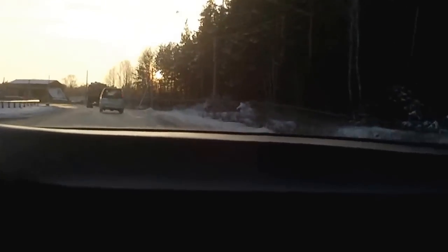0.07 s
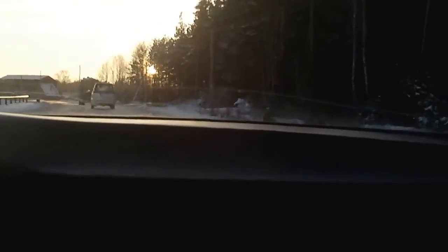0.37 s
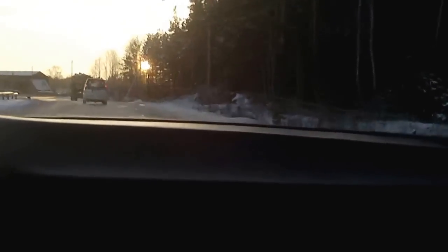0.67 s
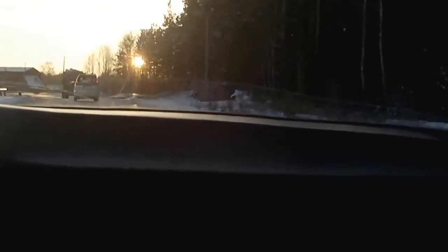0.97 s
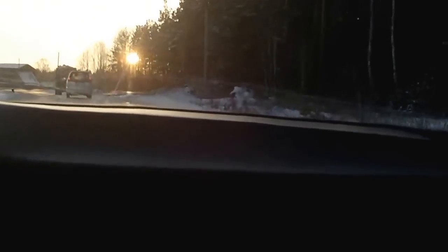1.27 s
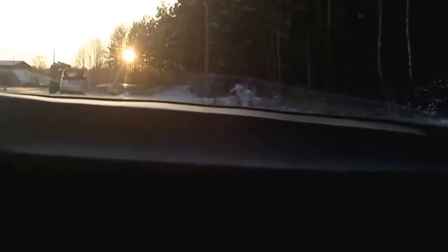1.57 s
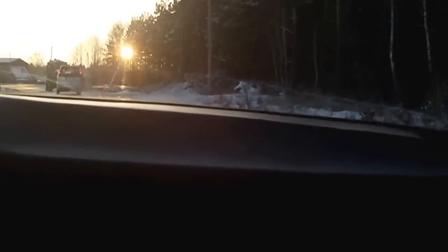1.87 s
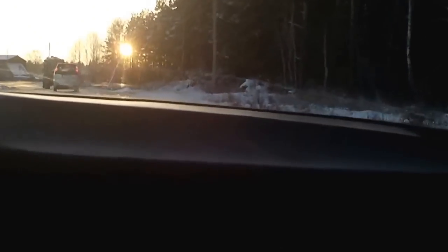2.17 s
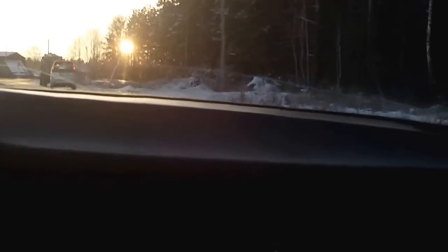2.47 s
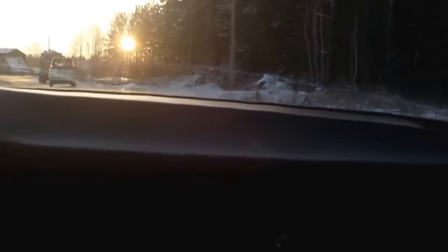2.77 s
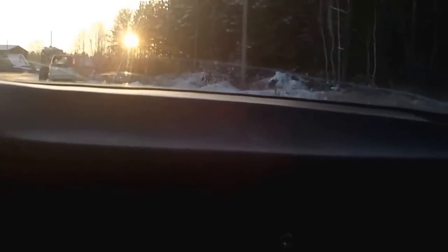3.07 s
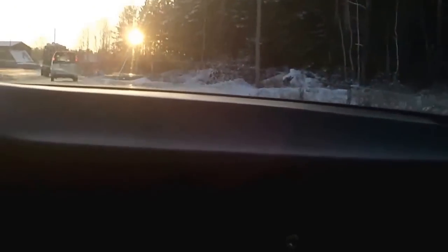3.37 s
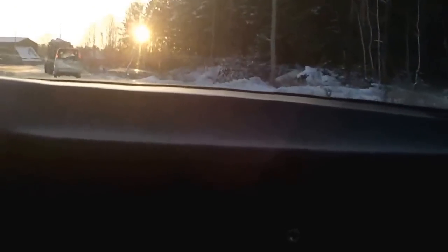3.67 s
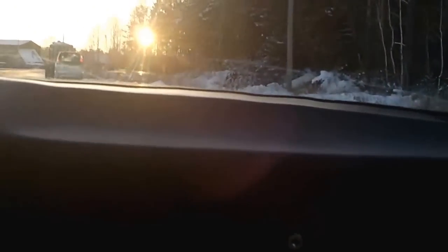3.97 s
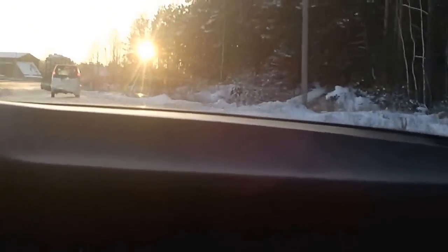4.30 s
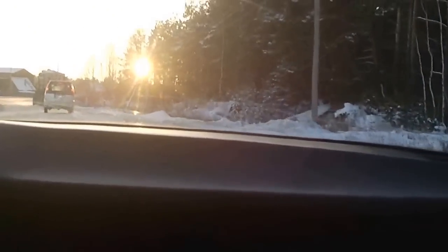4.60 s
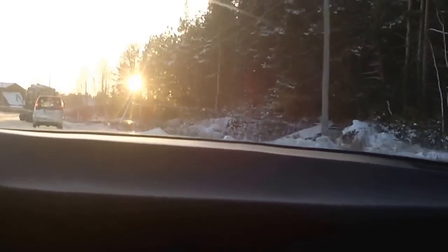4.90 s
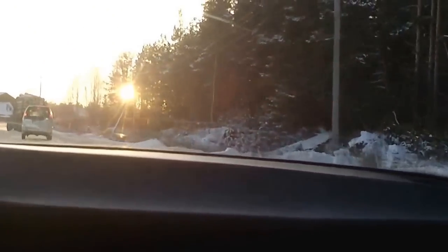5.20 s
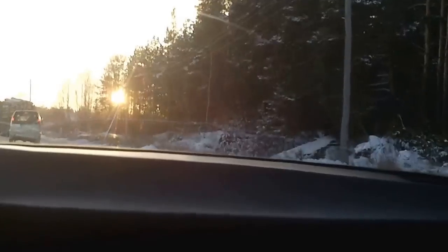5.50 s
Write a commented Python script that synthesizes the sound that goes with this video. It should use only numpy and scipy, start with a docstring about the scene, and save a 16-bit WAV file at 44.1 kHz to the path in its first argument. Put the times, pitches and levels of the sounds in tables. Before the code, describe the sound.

Inside a car on a highway, a loud low rumble swells over uneven asphalt, with a dull tyre roar and an engine drone. About halfway through, plastic squeaks three times in quick succession close to the dashboard microphone, followed by scattered light ticks and faint rustles. The car then slows harder, so the drone sinks in pitch and the road noise eases. A faint hiss lies underneath.

```python
"""Inside a car on a winter highway, microphone at the dashboard. From the start the body rumbles over uneven
asphalt, the tyres roar dully and the engine drones as the car coasts. At 2.5 s rubbed plastic squeaks three
times close by, then ticks and rustles in the small, padded cabin. From 3.6 s the car slows harder in gear:
the drone sinks and the road noise eases, with the sharpest tick at 4.6 s. The microphone's own hiss and a
thin electronic whine lie under it all."""
import sys
import numpy as np
from scipy import signal
from scipy.fft import rfft, irfft
from scipy.io import wavfile
from scipy.ndimage import uniform_filter1d, minimum_filter1d

SR = 44100
rng = np.random.default_rng(int(sys.argv[2]) if len(sys.argv) > 2 else 0)


def master_out(mix):
    """Clip the mix to full scale and print it as 16-bit PCM to the path in sys.argv[1]."""
    frames = np.transpose(np.atleast_2d(mix))
    ceiling = np.clip(frames, -1, 1)
    pcm = np.round(ceiling * 32767).astype(np.int16)
    wavfile.write(sys.argv[1], SR, pcm)


N = 249165
TIME = np.arange(N) / SR
TOP_HZ = 15900  # upper edge of the sound

# the car coasts, then slows harder, staying in gear: (time [s], crankshaft speed [Hz])
SLOWDOWN = [(0, 46.85), (1.4, 45.0), (3.62, 41.0), (5.65, 28.7)]
CRANK_HZ = np.interp(TIME, *np.transpose(SLOWDOWN))
SPEED = CRANK_HZ / CRANK_HZ[0]  # share of full speed


def road(rumble_db=-10, boom_db=-16.5, roar_db=-38.5, tread_db=-51):
    """Asphalt shakes body and wheels; tyres roar and hiss over rough patches; all fade with speed."""
    # spectra from inside the car, each (frequency [Hz], relative level [dB])
    body_rumble = [(6, -0.5), (14, 4.5), (24, -3), (36, 2.5), (48, -10), (66, -17.5), (96, -25.5),
                   (120, -16), (158, -23.5), (200, -21.5), (265, -23.5), (310, -31.5), (450, -55.5),
                   (1500, -110)]
    wheel_boom = [(15, -70), (38, -8.5), (50, -2), (72, -0.5), (100, -18.5), (300, -85)]
    tyre_roar = [(200, 0.5), (340, 6), (430, 3.5), (520, 0), (620, 0.5), (820, -1), (1020, -7),
                 (1280, -8.5), (1600, -21.5), (6000, -96)]
    tread_hiss = [(300, 8), (1500, 6.5), (2100, 6.5), (2900, 4), (3500, 1), (4200, -7.5), (5600, -17),
                  (7000, -23), (15000, -57)]
    surface = walk(16)
    body = noise(body_rumble) * undb(rumble_db) * SPEED ** .71
    wheels = noise(wheel_boom) * undb(boom_db) * SPEED ** 4.5
    tyres = noise(tyre_roar) * undb(roar_db + .5 * surface) * SPEED ** 1.29
    tread = noise(tread_hiss) * undb(tread_db + .9 * walk(24.78)) * SPEED ** .81
    return body + wheels + tyres + tread


def bumps(spread=1.8):
    """Each bumpy stretch makes the body heave or boom for a moment around one frequency."""
    # bumpy stretches of road: (middle [s], length [s], level [dB], body shake [Hz])
    stretches = [(.41, .25, -22, 122), (.5, .55, -17, 58), (.83, .2, -11, 30), (1.01, .14, -15, 62),
                 (1.215, .16, -8.5, 63), (1.3, .3, -8.5, 27), (1.51, .18, -23, 135), (1.65, .25, -12, 28),
                 (2.02, .08, -42, 520), (2.05, .25, -16, 60), (2.2, .45, -8, 32), (2.92, .4, -12.5, 33),
                 (3.895, .08, -39, 410), (3.93, .38, -9, 27), (4.43, .2, -14, 28), (5.17, .16, -13, 32),
                 (5.25, .2, -17, 56), (5.47, .2, -11.5, 26), (5.6, .16, -24, 112)]
    out = 0
    for middle, length, db, hz in stretches:
        band = [(hz / spread ** 2, -60), (hz / spread, -14), (hz, 0),
                (hz * spread, -20), (hz * spread ** 3, -100)]
        out = out + noise(band) * undb(db) * swell(middle, length)
    return out


def engine(waver_db=2.0, flutter_db=2.5, wander=.00699):
    """Engine and gearbox tones slide through the cabin's resonances and flutter as the car shakes."""
    # orders: (multiple of crankshaft speed, level at full speed on a 0 dB resonance [dB], power of speed)
    orders = [(3, -32, 2), (3.25, -37.5, -3.2), (4, -29, 3.5), (5, -29, 0), (6, -39, 0), (7, -46, -1.5),
              (8, -47, 1), (14.55, -51, 1.5), (19.3, -51, 3)]
    # cabin resonances: (centre [Hz], width [Hz], peak [dB])
    modes = [(113.4, 20, 1.5), (124.9, 4.3, 3.5), (135, 11.5, -0.5), (173.8, 6.3, -4.5), (185.7, 26.6, 0),
             (209.1, 13.7, 3), (222.4, 17.7, -0.5), (268.3, 17, 0), (349, 125, 0), (615, 77, -1),
             (774, 230, -5.5), (890, 28, -2)]
    crank_angle = 2 * np.pi * np.cumsum(CRANK_HZ * (1 + wander * walk(14))) / SR
    out = 0
    for order, db, power in orders:
        mode_gains = [undb(peak) * resonance(order * CRANK_HZ, hz, width) for hz, width, peak in modes]
        cabin_gain = np.linalg.norm(mode_gains, axis=0)
        level_db = db + waver_db * walk(7.4) + flutter_db * walk(35)
        tone = np.sqrt(2) * np.sin(order * crank_angle + 2 * np.pi * rng.random())
        out = out + tone * cabin_gain * SPEED ** power * undb(level_db)
    return out


def squeaks(release_s=.01, chatter_db=2.3, second_contact_db=-4.5):
    """Plastic close by sticks and slips at two contacts whose rates clash in a rasp, over a dry scrape."""
    # rubbing strokes: (start [s], length [s], attack [s], level [dB], tilt [dB/octave],
    # scrape against tone [dB], unsteadiness of slip [0-1], second contact's rate against the first [ratio])
    strokes = [(2.502, .042, .004, -46.5, -1, 0, .13, 1.2), (2.549, .032, .008, -50.5, -.5, -6, .04, .97),
               (2.607, .056, .024, -40.8, .4, -8, .08, 1.36),
               (2.672, .044, .002, -41.6, -1.3, -8, .065, 1.16)]
    # climbs through two strokes, then drops and settles in each of the others: (time [s], slip rate [Hz])
    slip_rate = [(2.502, 1000), (2.535, 3100), (2.555, 5600), (2.574, 5800), (2.582, 6700), (2.607, 13500),
                 (2.611, 8800), (2.618, 5400), (2.63, 4100), (2.645, 4300), (2.66, 5200), (2.671, 5300),
                 (2.673, 10500), (2.677, 7500), (2.69, 5800), (2.702, 4950), (2.725, 5100)]
    # what the rubbed plastic radiates: (frequency [Hz], gain [dB])
    plastic = [(600, -17), (1700, 4), (3300, 2), (4400, -3), (5800, -.5), (7000, -4), (8200, 2.5),
               (9200, -4), (10400, 2), (11800, -3), (13500, 2.5), (14500, -5), (16000, -7)]
    scrape_band = [(1500, -4), (5000, -4), (8000, -3), (10500, 1), (13500, 1), (15000, -2), (18000, -30)]
    glide_hz = np.interp(TIME, *np.transpose(slip_rate))
    second_gain = undb(second_contact_db)
    out = 0
    for start, length, attack, db, tilt_db, scrape_db, rough, ratio in strokes:
        age = TIME - start
        contact = np.clip(np.minimum(age / attack, .5 + (length - age) / release_s), 0, 1)
        first = stick_slip(glide_hz, rough)
        second = second_gain * stick_slip(glide_hz * ratio, rough)
        tone = (first + second) / np.hypot(1, second_gain)
        grip = np.sqrt(contact) * undb(db + chatter_db * walk(300))
        scrape = noise(scrape_band) * undb(scrape_db)
        out = out + grip * colour(tone + scrape, plastic, tilt_db)
    return cabin(out, t60=.04, wet_db=-5)


def stick_slip(hz, rough):
    """One contact slipping at an unsteady rate: up to three equal harmonics, rms 1."""
    phase = 2 * np.pi * np.cumsum(hz * (1 + rough * walk(2200))) / SR
    audible = [k * hz < TOP_HZ for k in range(1, 4)]
    tone = sum(on * np.sin(k * phase) for k, on in enumerate(audible, 1))
    return tone / np.sqrt(np.maximum(sum(audible), 1) / 2)


def ticks(attack_s=.001):
    """Short bursts of tiny slips each ring one plastic part close by; a soft contact has no top."""
    # plastic ticks: (time [s], level with the energy spread over 10 ms [dB], tilt [dB/octave],
    # decay [s], ring [Hz], ring strength [dB], top of the treble [Hz])
    contacts = [(2.826, -46, -5, .008, 2400, 6, 6000), (3.123, -50, 0, .005, 2800, 4, 11000),
                (3.291, -38.5, 0, .009, 3000, 4, 12500), (3.299, -35, -1.2, .011, 3150, 5, 15500),
                (3.594, -44.5, -2, .012, 2300, 8, 6000), (4.266, -43, -1, .004, 5300, 7, 5800),
                (4.42, -50, 3, .006, 2800, 4, 14000), (4.463, -49, -3, .004, 1900, 4, 6000),
                (4.6185, -31, .2, .0068, 2450, 3.5, 14500), (4.836, -41.5, 1.5, .009, 1200, 8, 15500),
                (5.335, -50.5, -2, .004, 2400, 6, 14000), (5.523, -52, 2, .003, 2800, 4, 8000)]
    # colour common to all ticks: (frequency [Hz], relative level [dB])
    plastic = [(200, -40), (700, -6), (1150, 4), (1650, 0), (2100, 3), (3000, 1), (4100, -6.5), (5700, -2),
               (7200, -11), (8400, -4), (9400, -9.5), (10600, -4), (12000, -9), (13200, -8.5), (14500, -17),
               (15800, -18)]
    out = np.zeros(N)
    t = TIME[:SR // 10]
    lead = SR // 200  # room for the filters to ring ahead of the tick
    for time, db, tilt_db, decay_s, ring_hz, ring_db, top_hz in contacts:
        slips = rng.standard_normal(len(t)) * np.minimum(t / attack_s, 1) * np.exp(-t / decay_s)
        click = colour(np.roll(slips, lead), plastic, tilt_db)
        part = [(ring_hz / 1.3, 0), (ring_hz, ring_db), (ring_hz * 1.3, 0),
                (top_hz, 0), (top_hz * 1.2, -16)]
        start = int(time * SR) - lead
        out[start:start + len(t)] += unit(colour(click, part)) / np.sqrt(10) * undb(db)
    return cabin(out, t60=.07, wet_db=-6)


def rustle(grain_db=3.5):
    """Faint rustles near the microphone: many tiny slips in uneven clusters, swelling now and then."""
    # soft rustles: (middle [s], length [s], level [dB], tilt [dB/octave])
    swells = [(.138, .035, -54, -3), (.245, .035, -49.5, -11), (.3, .13, -54.5, -7), (.41, .2, -51.5, -13),
              (3.06, .08, -56.5, -3), (3.8, .12, -57, -3), (3.89, .3, -58, 0), (3.965, .05, -53, -3),
              (4.035, .1, -56, -3), (4.125, .04, -57, -3), (4.53, .1, -58, -11), (4.68, .3, -61, -1),
              (5.225, .05, -55.5, -10)]
    # colour of the slips: (frequency [Hz], relative level [dB])
    spectrum = [(500, -30), (2000, 2), (4000, 1), (6000, 1), (7200, -7), (9000, -5), (11000, -1),
                (13500, -4), (14800, -16), (16000, -30)]
    grains = rng.standard_normal(N) * undb(grain_db * walk(300) + walk(38))
    return sum(unit(colour(grains, spectrum, tilt_db)) * undb(db) * swell(middle, length)
               for middle, length, db, tilt_db in swells)


def cabin(dry, t60, wet_db):
    """Direct sound plus dense, quickly dying reflections off glass and dashboard."""
    t = TIME[:SR // 5]
    tail = rng.standard_normal(len(t)) * np.exp(-np.log(1000) * t / t60) * (t > .001)
    echoes = signal.fftconvolve(dry, tail / np.linalg.norm(tail))[:N]
    return (dry + undb(wet_db) * echoes) / np.hypot(1, undb(wet_db))


def microphone(hiss_db=-56):
    """The microphone's own hiss and the faint steady whine of its electronics."""
    # self-noise: (frequency [Hz], relative level [dB])
    hiss = [(1000, 2.5), (4500, 0.4), (5700, 2), (7000, -0.5), (8200, 0.4), (9300, -0.6), (10600, 0.6),
            (13300, -2.3), (14500, -1.5), (15800, -0.1)]
    # tones of the electronics: (frequency [Hz], level [dB])
    tones = [(7881, -71), (11989, -73), (15406, -78), (15466, -79), (15703, -69)]
    whine = sum(np.sqrt(2) * undb(db) * np.sin(2 * np.pi * hz * TIME) for hz, db in tones)
    return noise(hiss) * undb(hiss_db) + whine


def undb(db):
    """Decibels to gain."""
    return 10 ** (np.asarray(db) / 20)


def unit(x):
    """Scale to rms 1."""
    return x / np.sqrt(np.mean(x ** 2) + 1e-20)


def colour(x, spectrum, tilt_db=0):
    """Filter by a (frequency [Hz], gain [dB]) outline, tilted for two octaves either side of 3 kHz."""
    hz, db = np.transpose(spectrum)
    octave = np.log2(np.maximum(np.fft.rfftfreq(len(x), 1 / SR), 1))
    slope = tilt_db * np.clip(octave - np.log2(3000), -2, 2)
    return irfft(rfft(x) * undb(np.interp(octave, np.log2(hz), db) + slope), len(x))


def noise(spectrum):
    """Coloured noise of rms 1."""
    return unit(colour(rng.standard_normal(N), spectrum))


def walk(rate):
    """Random levels held 1 / rate s and smoothed twice; spread near 1."""
    hold = max(int(SR / rate), 1)
    held = np.repeat(rng.standard_normal(N // hold + 1), hold)
    return 1.226 * uniform_filter1d(uniform_filter1d(held, hold), hold)[:N]


def swell(middle, length):
    """A smooth rise and fall, 1 at its middle."""
    return np.cos(np.pi * np.clip((TIME - middle) / length, -.5, .5))


def resonance(hz, centre, width):
    """Gain of a steep resonance, 1 at its centre."""
    return 1 / (1 + (2 * (hz - centre) / width) ** 2)


def scene():
    """Everything as heard by one microphone at the dashboard."""
    return (engine() + road() + bumps() + rustle() + ticks() + squeaks() + microphone())[None]


def record(dry):
    """A smooth limiter holds the biggest heaves of the rumble at full scale; the top is cut."""
    hold = SR // 200
    safe_gain = minimum_filter1d(1 / np.maximum(np.abs(dry), 1), 2 * hold)
    gain = uniform_filter1d(uniform_filter1d(safe_gain, hold), hold)
    lowpass = signal.ellip(14, .1, 80, TOP_HZ, fs=SR, output="sos")
    return signal.sosfilt(lowpass, dry * gain)


dry = scene()
out = record(dry)
master_out(out)
```